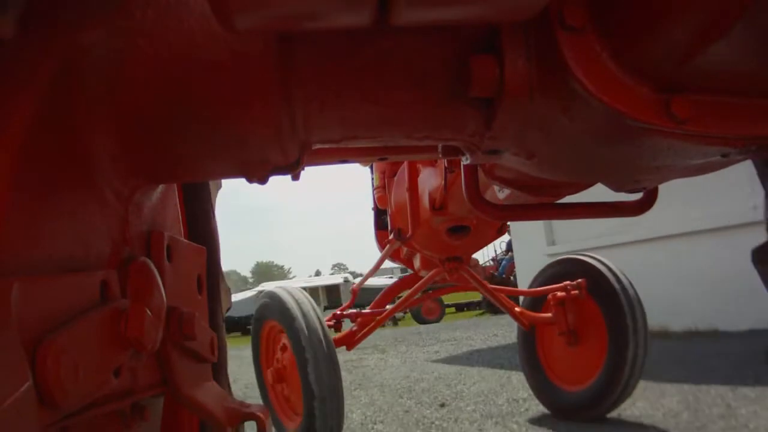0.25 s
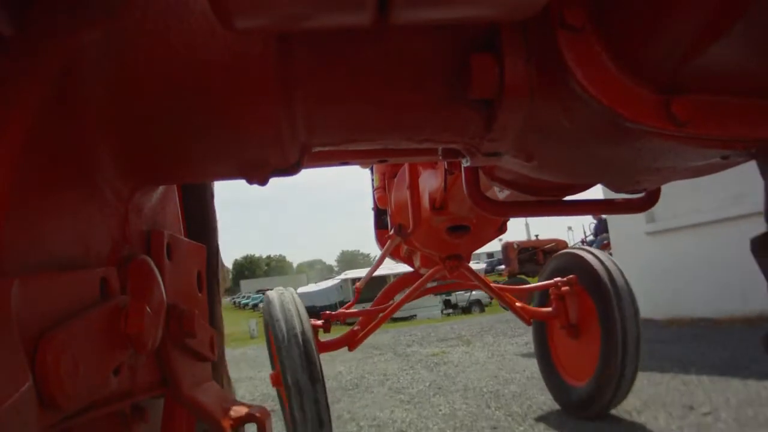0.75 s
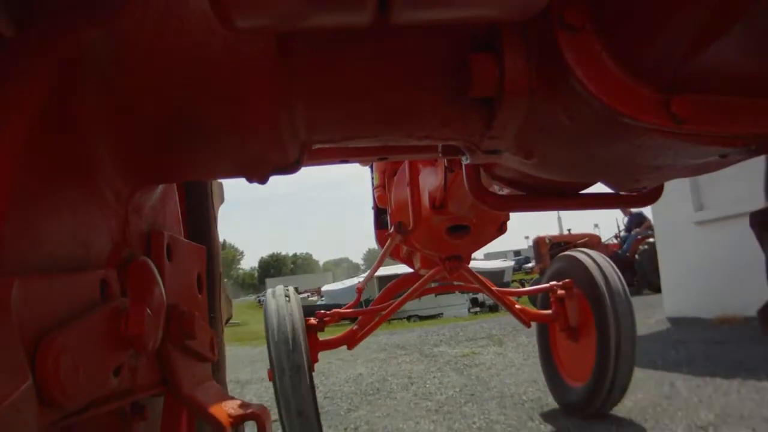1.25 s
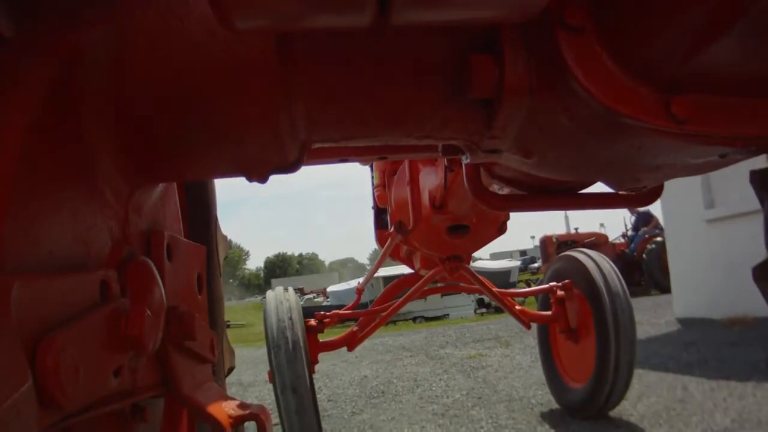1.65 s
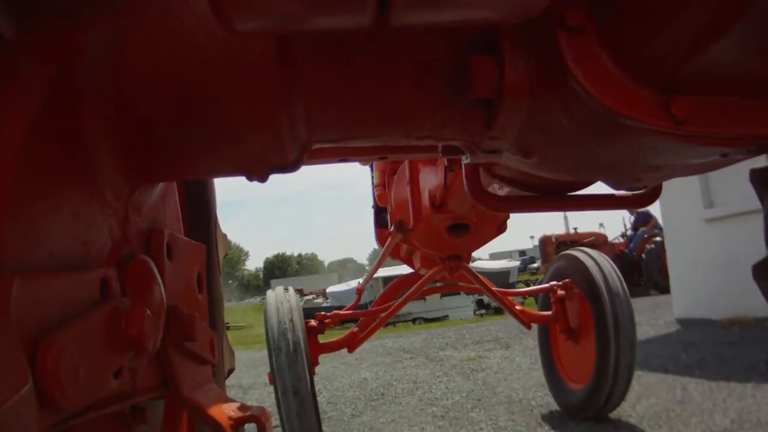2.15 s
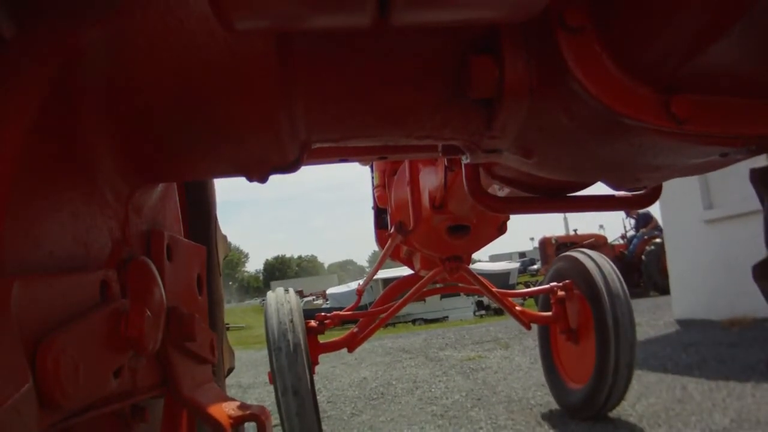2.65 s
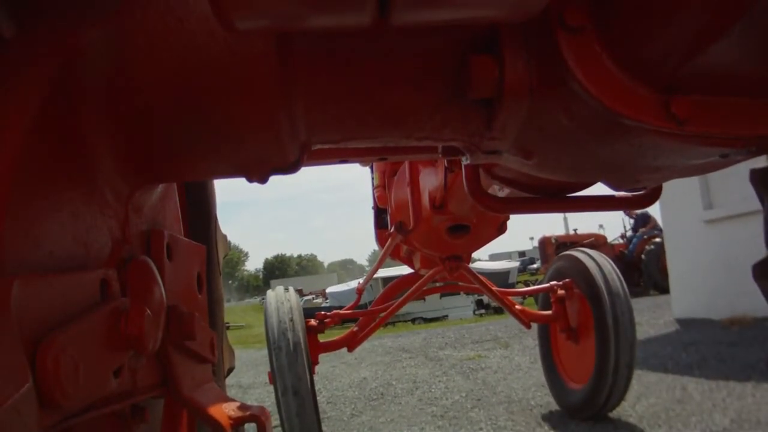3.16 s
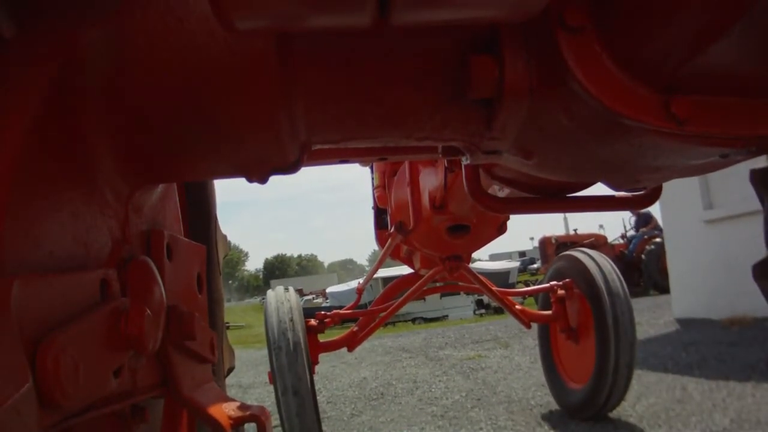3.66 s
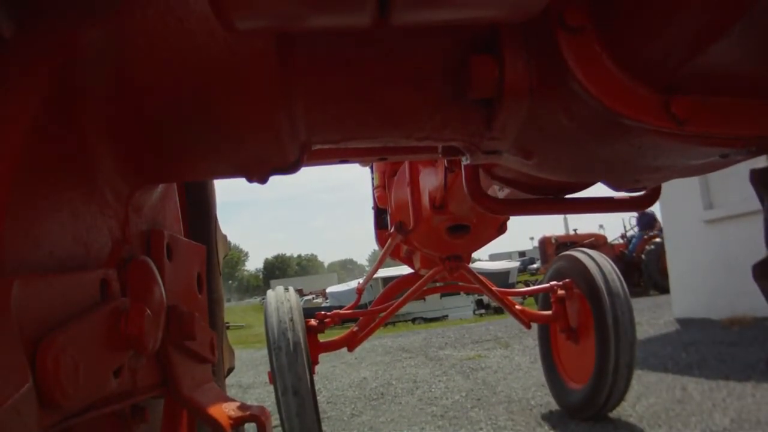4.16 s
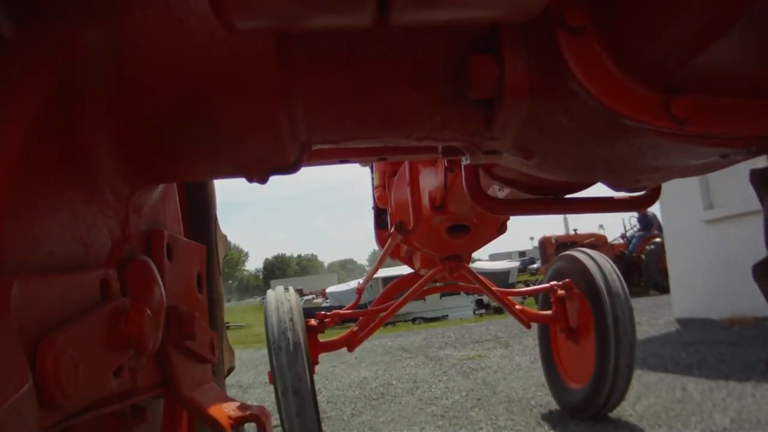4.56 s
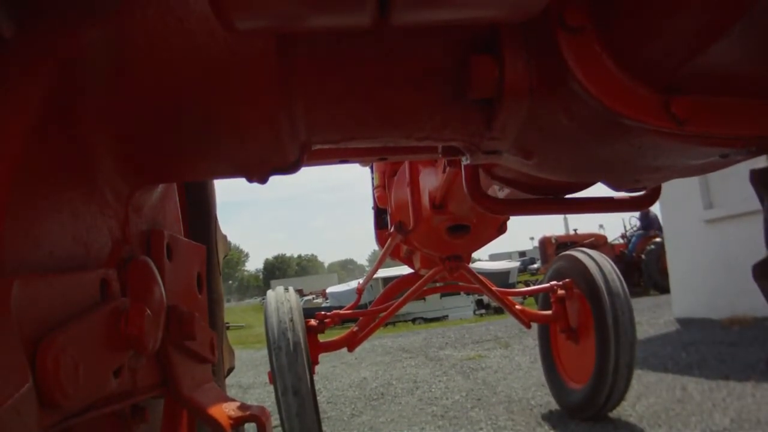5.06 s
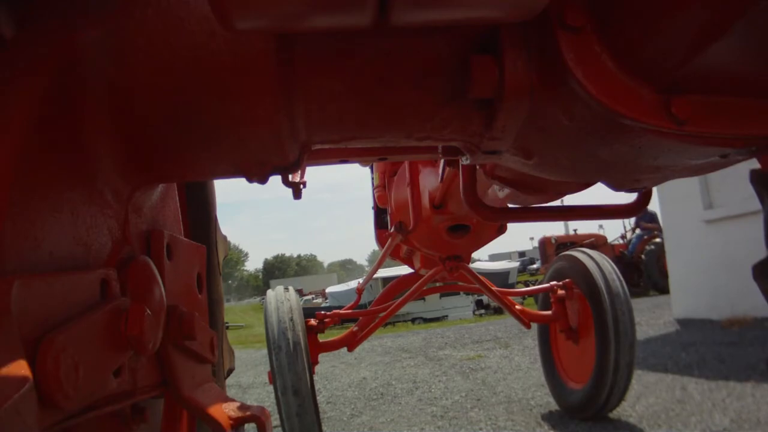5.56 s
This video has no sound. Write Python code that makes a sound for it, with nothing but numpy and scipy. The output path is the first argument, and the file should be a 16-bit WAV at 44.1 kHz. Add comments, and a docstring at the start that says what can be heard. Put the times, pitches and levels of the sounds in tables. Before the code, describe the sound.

From beneath a tractor, a four-cylinder engine clatters, a loose mount chatters in bursts, then the motor winds down to quiet yard drone.

```python
"""Old tractor engine, switched off

A four-cylinder engine runs at fast idle in a gravel yard, is switched off and coasts to a stop.
Exhaust tones follow the crank, while noise throbbing with each firing makes the roar and valve clatter.
The microphone sits in a housing under the chassis: a loose mount knocks on it and rings its modes.
The linkage thuds in low rings, gears clank in dying noise, sharp treble clicks spray and a small pin jingles.
Far engines drone in the yard, and a hiss grows with the knocks."""
import sys
import numpy as np
from scipy import signal
from scipy.io import wavfile
from scipy.ndimage import uniform_filter1d

SR = 44100
rng = np.random.default_rng(int(sys.argv[2]) if len(sys.argv) > 2 else 0)


def to_wav(sig):
    """Store sig (one row per channel, or 1-D mono) as 16-bit WAV at the path in sys.argv[1].

    Samples outside -1..1 are clipped; the rate is SR.
    """
    pcm = np.clip(np.atleast_2d(sig), -1, 1) * 32767
    pcm = np.round(pcm).astype(np.int16)
    wavfile.write(sys.argv[1], SR, pcm.T)  # frames by channels


N = 256220


def from_db(db):
    """Turn decibels into a gain."""
    return 10 ** (np.asarray(db) / 20)


def rms_one(x):
    """Scale a sound to an rms of 1."""
    return x / np.sqrt(np.mean(x ** 2) + 1e-20)


def in_time(rows):
    """Join the rows of a table with straight lines, giving each column a value at every sample."""
    start_s, *columns = np.transpose(rows)
    return [np.interp(np.arange(N) / SR, start_s, column) for column in columns]


def drift(rate_hz):
    """A slow random wander of rms 1: noise smoothed twice, drawn at every 40th sample."""
    pole = np.exp(-80 * np.pi * rate_hz / SR)
    noise = rng.standard_normal(N // 40 + 2002)
    slow = signal.lfilter([1], [1, -2 * pole, pole * pole], noise)[2000:]   # skip the settling
    return np.interp(np.arange(N) / 40, np.arange(len(slow)), rms_one(slow))


def coloured(spectrum, patchy_db, source=None):
    """Noise in flickering fifth-octave bands, shaped by a spectrum and scaled to rms 1."""
    hz, level_db = np.transpose(spectrum)
    white = rng.standard_normal((2, N)) * (1 if source is None else source)
    edges = 22 * 2 ** np.arange(0, 9.7, 1 / 5)
    flicker = [drift(9) for _ in range(12)]   # shared out among the bands
    out = 0
    for k, (low, high) in enumerate(zip(edges, edges[1:])):
        if high > hz[0] and low < hz[-1]:
            band_filter = signal.butter(2, [low, high], "band", fs=SR, output="sos")
            band = signal.sosfilt(band_filter, white[k % 2])
            band_db = np.interp(np.log(low * high) / 2, np.log(hz), level_db)
            out = out + from_db(band_db + patchy_db * flicker[k % 12]) * band
    return rms_one(out)


def ring(clicks, hz, t60):
    """Each click sets off a sine that dies by 60 dB in t60 seconds; a unit click starts it at height 1."""
    decay, turn = from_db(-60 / (t60 * SR)), 2 * np.pi * hz / SR
    return signal.lfilter([0, np.sin(turn)], [1, -2 * decay * np.cos(turn), decay * decay], clicks + 1e-18)


def bursts(start_s, level_db, t60, rise_s):
    """A sum of envelopes that swell over about rise_s and die away over t60."""
    out = np.zeros(N)
    for s, db, fade_s in zip(start_s, level_db, t60):
        at = round(s * SR)
        age = np.arange(min(N - at, round(fade_s * SR))) / SR
        out[at:at + len(age)] += from_db(db - 60 * age / fade_s) * (1 - np.exp(-age / rise_s))
    return out


# tone colour of the hiss: [pitch_hz, level_db per Hz, relative]
HISS_COLOUR = [(500, -6), (3000, -7.5), (7000, -6), (11000, -5), (15600, -4.5)]
HISS_DB, FIZZ_DB = -74.5, -38   # steady part; part that grows with the knocks


def hiss(knocks):
    """Flickering noise that swells with the loudness of the knocks."""
    loudness = np.sqrt(np.abs(uniform_filter1d(knocks ** 2, size=900)))
    return (from_db(HISS_DB) + from_db(FIZZ_DB) * loudness) * coloured(HISS_COLOUR, patchy_db=4.0)


# tone colour of the yard: [pitch_hz, level_db per Hz, relative]
YARD_COLOUR = [(25, -23), (45, -11), (75, -1), (100, -2), (150, -4.5), (230, -39.5), (340, -3), (750, -31),
               (1150, -39), (1500, -26.5), (3200, -31.5), (4400, -24.5), (5200, -43), (15600, -44.5)]
YARD_DB = -44.5
FAR_ENGINE_PER_S = 31.8   # firings per second
FAR_WHINE_HZ, FAR_WHINE_T60_S, FAR_WHINE_DB = 2620, 0.028, -57
FAR_DRONE_HZ, FAR_DRONE_T60_S, FAR_DRONE_DB = 77, 0.59, -53


def yard():
    """Coloured noise and a low drone, with one far engine whose whine throbs at its firing rate."""
    since_firing = FAR_ENGINE_PER_S * np.arange(N) / SR % 1
    throb = 0.14 + np.exp(-since_firing / 0.29)
    whine = rms_one(ring(throb * rng.standard_normal(N), FAR_WHINE_HZ, FAR_WHINE_T60_S))
    drone = rms_one(ring(rng.standard_normal(N), FAR_DRONE_HZ, FAR_DRONE_T60_S))
    backdrop = from_db(YARD_DB) * coloured(YARD_COLOUR, patchy_db=2.0)
    return backdrop + from_db(FAR_WHINE_DB) * whine + from_db(FAR_DRONE_DB) * drone


# ringing tones of a loose steel pin: [pitch_hz, level_db, t60_s]
PIN_TONES = [(5690, -41, 0.11), (7000, -38.5, .09), (8100, -44, 0.043)]
JINGLE_S = .074   # time of the stronger touch


def jingle():
    """A weak and then a full touch make a small steel pin ring."""
    touch = np.zeros(N)
    touch[round(JINGLE_S * SR) + np.array([-300, 0])] = .4, 1
    return sum(from_db(level_db) * ring(touch, hz, t60) for hz, level_db, t60 in PIN_TONES)


# sharp treble clicks: [start_s, level_db]
TREBLE_CLICKS = [(1.0695, -34), (1.2147, -35), (1.2347, -38), (1.3145, -40), (1.3813, -33), (1.4073, -30),
                 (1.4437, -39), (1.4611, -36), (1.52, -35), (1.6951, -33), (1.8019, -26.5), (1.8732, -26),
                 (1.9525, -31.5), (2.0119, -39), (2.0393, -42), (2.1685, -34), (2.2987, -37), (2.3192, -40),
                 (2.647, -49), (2.8884, -37), (2.9383, -40), (2.9612, -33), (3.0216, -35), (3.0495, -38),
                 (3.0904, -38), (3.1428, -36), (3.2281, -37), (3.3419, -42), (3.3913, -42), (3.4781, -37)]
SPRAY_DB = 6.5   # spray against its click
STRAY_CLICKS_PER_S, STRAY_CLICK_DB = 5.0, -44   # random faint ones before switch-off: average rate, mid level


def treble_clicks():
    """A sharp click of noise, then a spray of smaller ones, filtered to the treble."""
    start_s, level_db = np.transpose(TREBLE_CLICKS)
    luck = rng.random((40, 2))
    stray_s = np.cumsum(-np.log(1 - luck[:, 0])) / STRAY_CLICKS_PER_S
    running = stray_s < SWITCH_OFF_S
    stray_db = STRAY_CLICK_DB + 10 * (luck[running, 1] - .5)
    start_s, level_db = np.append(start_s, stray_s[running]), np.append(level_db, stray_db)
    click = rng.standard_normal(N) * bursts(start_s, level_db, np.full(len(start_s), .006), .0001)
    tiny_clicks = rng.standard_normal(N) * (rng.random(N) < 1200 / SR)
    spray = tiny_clicks * bursts(start_s, level_db + SPRAY_DB, np.full(len(start_s), .09), 0.00079)
    treble = signal.butter(1, [3000, 11000], "band", fs=SR, output="sos")
    return signal.sosfilt(treble, click + spray)


# gears clank as the load changes and the crank rocks to rest: [start_s, level_db, t60_s]
GEAR_CLANKS = [(.030, -22, 0.1), (0.04, -19.5, 0.091), (.074, -24, 0.077), (5.045, -27.5, .16),
               (5.0863, -26.5, .066), (5.127, -36.5, 0.12), (5.217, -36, 0.088), (5.2668, -37, .12),
               (5.296, -31, 0.094), (5.3434, -25, 0.089)]
# tone colour of a clank: [pitch_hz, level_db per Hz, relative]
CLANK_COLOUR = [(400, 5.5), (600, 8.5), (1000, -4), (1300, 5.5), (1800, -8), (2500, -2), (4300, -6.5),
                (5300, -23.5), (7800, -19), (15600, -61)]


def clanks():
    """Steel on steel rings in too many modes to count: a burst of dying noise."""
    start_s, level_db, t60 = np.transpose(GEAR_CLANKS)
    return bursts(start_s, level_db, t60, rise_s=.001) * coloured(CLANK_COLOUR, patchy_db=-4.0)


# the linkage thuds: [start_s, level_db, centre_pitch_hz, t60_s]
LINKAGE_THUDS = [(.028, -13.5, 344, 0.058), (.037, -9, 437, 0.051), (.058, -9.5, 304, 0.078),
                 (0.081, -12, 557, 0.047), (0.104, -16.5, 556, 0.17), (0.806, -10, 444, 0.048),
                 (0.93, -14, 367, 0.046), (1.069, -3, 561, 0.037), (2.037, -10.5, 420, 0.059),
                 (2.114, -12, 488, 0.074), (2.288, -10, 430, 0.05), (4.712, -26.5, 336.6, 0.28),
                 (5.052, -26, 558, 0.19), (5.271, -26, 321, 0.12), (5.312, -23.5, 315, 0.13),
                 (5.359, -17.5, 336, 0.14)]


def thuds():
    """Heavy parts answer a soft blow with a cluster of three low rings."""
    out = np.zeros(N)
    for start_s, thud_db, hz, t60 in LINKAGE_THUDS:
        blow = np.zeros(N)
        blow[round(start_s * SR):][:60] = np.hanning(60) / 30
        for ratio, level_db in [(.72, -16), (1.01, -1), (1.33, -15.5)]:
            out += from_db(thud_db + level_db) * ring(blow, hz * ratio, t60)
    return out


# the loose mount knocks on its housing: [start_s, level_db]
MOUNT_KNOCKS = [(0.1112, -27.5), (.294, -29), (0.2963, -31), (.3767, -25), (0.538, -30), (0.6206, -24.5),
                (1.118, -19.5), (1.146, -23), (1.172, -12.5), (1.1945, -30), (1.2216, -15), (1.234, -24),
                (1.249, -27), (1.326, -20), (1.353, -23), (1.3804, -14), (1.4051, -10.5), (1.419, -17.5),
                (1.4341, -13.5), (1.4557, -17), (1.481, -18.5), (1.5049, -18.5), (1.5341, -15.5),
                (1.567, -19), (1.5832, -18.5), (1.611, -11), (1.635, -13.5), (1.6633, -15.5), (1.687, -16),
                (1.6955, -17.5), (1.707, -25), (1.7427, -14), (1.7636, -18), (1.7961, -8.5), (1.8052, -27),
                (1.8172, -18), (1.823, -16), (1.8444, -15.5), (1.856, -21), (1.8735, -11.5), (1.885, -30),
                (1.8945, -23), (1.952, -13.5), (1.9963, -20), (2.039, -32), (2.113, -32.5), (2.1678, -29.5),
                (2.226, -25), (2.25, -26), (2.2753, -14.5), (2.3026, -20), (2.319, -24.5), (2.3503, -29),
                (2.8563, -16.5), (2.8818, -10.5), (2.909, -18.5), (2.932, -17.5), (2.959, -10.5),
                (2.982, -23), (3.0093, -10), (3.0172, -26), (3.0359, -17), (3.0419, -17), (3.0607, -17),
                (3.0838, -19.5), (3.14, -17.5), (3.1675, -27), (3.2214, -25), (3.2391, -21), (3.2931, -26),
                (3.313, -28), (3.3354, -15.5), (3.362, -23), (3.39, -17), (3.3973, -21), (3.436, -22.5),
                (3.472, -19.5), (3.4883, -21.5), (3.498, -25), (3.513, -20.5), (3.53, -29), (3.54, -27),
                (3.5488, -30), (3.561, -12), (3.571, -21), (3.756, -23.5), (3.78, -24), (3.8075, -16),
                (3.831, -25), (3.8551, -32), (4.749, -42), (4.931, -40), (5.345, -31)]
# ringing tones (modes) of the housing: [pitch_hz, level_db before the changes below, t60_s]
HOUSING_MODES = [(135.3, -9, 0.35), (334.6, 0, 0.089), (1001, -10.5, 0.03), (1194, -7.5, 0.037),
                 (1214, -4, 0.042), (1335.6, 0.5, 0.053), (1517, -5.5, 0.014), (1663, -6.5, 0.016),
                 (1912, -4.5, 0.012), (2178, -17, 0.025), (2725, 1.5, 0.014), (3100, -3.5, 0.029),
                 (3720, -6, 0.034), (4455, -7.5, 0.034), (5920, -17, 0.013), (7950, -20.5, 0.01)]
BOUNCE_S, BOUNCE_LOSS_DB = 0.0069, 11.5   # typical delay and loss of the one bounce
USUAL_KNOCK_DB = -20
LOW_RING_DB, LOW_RING_LAG = -5, 0.48   # modes under 600 Hz grow less than the knock: dB lost per dB
BRIGHT_DB, BRIGHT_SPREAD_DB = -17, 3.5   # modes over 2400 Hz: average, and spread between knocks
CRACKLE_DB = -6   # dry crackle of a knock, before its share of the brightness


def chatter():
    """Each knock and its bounce is a scuffle of tiny contacts that strikes every housing mode by chance."""
    start_s, level_db = np.transpose(MOUNT_KNOCKS)
    luck = rng.standard_normal((len(start_s), 2 * len(HOUSING_MODES) + 5))
    start_s = np.append(start_s, start_s + BOUNCE_S * np.exp(.25 * luck[:, 0]))
    level_db = np.append(level_db, level_db - BOUNCE_LOSS_DB + 4 * luck[:, 1])
    # a bounce shares the luck of its knock in brightness and low ring
    bright_db = BRIGHT_DB + BRIGHT_SPREAD_DB * np.tile(luck[:, 2], 2)
    low_db = LOW_RING_DB - LOW_RING_LAG * (level_db - USUAL_KNOCK_DB) + 2 * np.tile(luck[:, 3], 2)
    mode_luck = np.vstack(np.split(luck[:, 5:], 2, axis=1))
    at = np.round(start_s * SR).astype(int)
    fade = from_db(-60 / (.04 * SR))   # the scuffle dies by 60 dB in 40 ms
    contacts = rng.standard_normal(N) * (rng.random(N) < 2500 / SR)

    def scuffle(size_db):
        """Hits at the knock times, each trailed by dying contacts."""
        hits = np.zeros(N)
        np.add.at(hits, at, from_db(size_db))
        return hits + .26 * contacts * signal.lfilter([1], [1, -fade], hits + 1e-18)

    crackle = scuffle(level_db + CRACKLE_DB + .5 * (bright_db - BRIGHT_DB))
    out = signal.sosfilt(signal.butter(2, [1500, 4600], "band", fs=SR, output="sos"), crackle)
    for k, (hz, mode_db, t60) in enumerate(HOUSING_MODES):
        colour_db = low_db if hz < 600 else bright_db if hz > 2400 else 0
        spread_db = 1.5 if 1200 < hz < 1400 else 3.5   # the main pair always speaks
        strike = scuffle(level_db + mode_db + colour_db + spread_db * mode_luck[:, k])
        out += ring(strike, hz, t60) * (-1) ** k
    return out


# speed of the running crank: [start_s, firings per second]
IDLE_SPEED = [(0, 33.2), (.18, 34.6), (.53, 37.7), (1.1, 38.4), (1.9, 39.2), (2.4, 39.5), (3.07, 39.2),
              (3.45, 40.2), (3.82, 39.8)]
SWITCH_OFF_S = 3.838
DRAG_PER_S, FRICTION_PER_S2 = .55, 15.7   # drag grows with speed; dry friction slows it steadily


def crank():
    """Firings per second: the idle, then a coast to a stop against drag and dry friction."""
    idle, = in_time(IDLE_SPEED)
    pull = FRICTION_PER_S2 / DRAG_PER_S   # the speed at which drag equals friction
    coasting_s = np.maximum(np.arange(N) / SR - SWITCH_OFF_S, 0)
    return np.maximum((idle + pull) * np.exp(-DRAG_PER_S * coasting_s) - pull, 0)


# engine load: [start_s, roar_db, exhaust_tone_db at full speed]
ENGINE_LOAD = [(0, -24.5, -30), (.25, -28.5, -30), (1.0, -27.5, -34), (1.3, -26.5, -31), (2.1, -26.5, -32),
               (2.7, -30.5, -32.5), (2.95, -25.5, -33.5), (3.2, -29, -30.5), (3.5, -27.5, -32.5),
               (3.75, -30.5, -33), (3.95, -34, -34), (4.4, -36.5, -33.5), (4.7, -37, -29),
               (5.0, -38.5, -33), (5.3, -39.5, -33), (5.81, -47.5, -33)]
# exhaust tones: [multiple of the firing rate, firing_db, coasting_db]
EXHAUST_TONES = [(1, -14, -8), (2, -4.5, -3), (3, 3, -2), (4, -1.5, -1), (5, -2, 2), (6, -12.5, -3.5),
                 (8, -10, -13)]
# average strength of each cylinder in turn: [level_db]
CYLINDERS_DB = [-0.5, -0.5, -1, -0.5]
# tone colour of the roar: [pitch_hz, level_db per Hz, relative]
ROAR_COLOUR = [(25, -30), (50, -26), (100, -14), (140, -3), (195, -4), (260, -6), (400, -5), (600, -5),
               (750, -9), (1060, -24), (1500, -30), (2500, -50)]
# tone colour of the valve clatter: [pitch_hz, level_db per Hz, relative]
CLATTER_COLOUR = [(700, -33), (1000, -14.5), (1400, -0.5), (1800, -6), (2500, 1.5), (3100, -7),
                  (3800, -0.5), (4400, -7), (5200, -40.5), (6200, -11.5), (7400, -16.5), (8600, -31.5),
                  (11000, -33.5), (15600, -50)]
VALVE_OPENS_S = 4.398   # one known opening sets the crank angle
FIRE_DIES_S = .08   # time to go from firing to coasting
FULL_PER_S = 39   # firings per second at full speed
CLATTER_DB = -37   # at full speed
TONE_SPEED_POWER, CLATTER_SPEED_POWER = 2.54, 1.13   # levels follow a power of crank speed
CHUFF_RUNNING, CHUFF_COASTING = 0.24, .56   # share of the clatter that comes in chuffs
HOUSING_RING_HZ, HOUSING_RING_T60_S, HOUSING_RING_DB = 335.3, .4, -10.5   # the housing's low mode, rung by the roar; level against the roar


def engine():
    """Exhaust tones locked to the crank; roar and valve clatter throb once per firing."""
    per_s = crank()
    roar_db, tone_db = in_time(ENGINE_LOAD)
    speed_db = 20 * np.log10(np.maximum(per_s, 3) / FULL_PER_S)
    tone_db = tone_db + TONE_SPEED_POWER * speed_db
    clatter_db = CLATTER_DB + CLATTER_SPEED_POWER * speed_db
    coasting = np.clip((np.arange(N) / SR - SWITCH_OFF_S) / FIRE_DIES_S, 0, 1)

    firings = np.cumsum(per_s) / SR
    firings = firings - firings[round(VALVE_OPENS_S * SR)] + 200   # a whole number at the known opening
    since = firings % 1   # share of the cycle since the valve opened
    strength_db = np.resize(CYLINDERS_DB, 400) + 0.79 * rng.standard_normal(400)   # no two are equal
    strength = from_db(np.interp(firings, np.arange(400), strength_db))

    tones = 0
    for multiple, fired_db, coast_db in EXHAUST_TONES:
        waver = from_db(2.3 * drift(5))
        level = from_db(fired_db + coasting * (coast_db - fired_db))
        tones = tones + waver * level * np.cos(2 * np.pi * multiple * firings)

    throb = 1.6 + np.exp(-since / 0.47)
    roar = coloured(ROAR_COLOUR, patchy_db=1.46, source=strength * throb)
    # the roar also rings the housing's low mode
    roar = roar + from_db(HOUSING_RING_DB) * rms_one(ring(roar, HOUSING_RING_HZ, HOUSING_RING_T60_S))

    chuff = rms_one(uniform_filter1d(np.exp(-since / .32), size=220))
    share = np.clip(CHUFF_RUNNING + coasting * (CHUFF_COASTING - CHUFF_RUNNING), 0, 1)
    grit = from_db(1.5 * np.minimum(rng.exponential(1, N), 4))   # tappets and gear teeth are grainy
    rattle = grit * strength * (1 - share + share * chuff)
    clatter = coloured(CLATTER_COLOUR, patchy_db=0.84, source=rattle)

    exhaust = from_db(tone_db) * np.sqrt(strength) * tones
    return exhaust + from_db(roar_db) * roar + from_db(clatter_db) * clatter


def scene():
    """One microphone feeds both channels; only the hiss differs between them."""
    knocks = chatter() + thuds() + clanks()
    no_bass = signal.butter(4, 110, "high", fs=SR, output="sos")   # small parts give no deep bass
    knocks = signal.sosfilt(no_bass, knocks)
    sides = np.array([[.85], [-1.15]])   # stronger on the right, and turned upside down there
    return engine() + knocks + treble_clicks() + jingle() + yard() + hiss(knocks) * sides


RUMBLE_CUT_HZ, CUTOFF_HZ = 34, 15800


def record(dry):
    """The deepest bass is rolled off, peaks are gently rounded, the top is cut."""
    dry = signal.sosfilt(signal.butter(2, RUMBLE_CUT_HZ, "high", fs=SR, output="sos"), dry)
    rounded = 1.5 * np.tanh(dry / 1.5)
    return signal.sosfilt(signal.cheby2(18, 60, CUTOFF_HZ, fs=SR, output="sos"), rounded)


dry = scene()
out = record(dry)
to_wav(out)
```